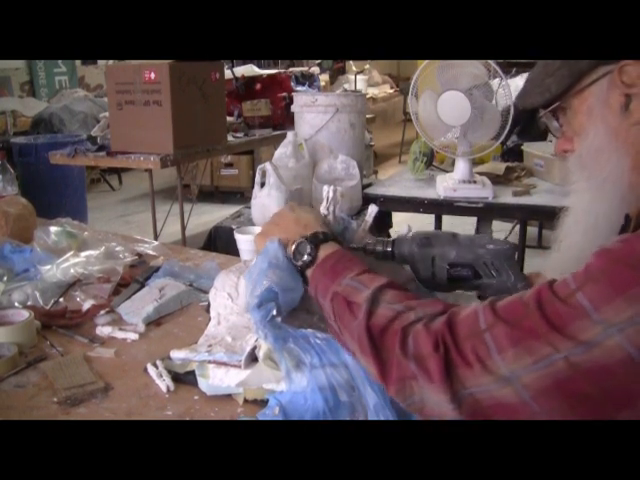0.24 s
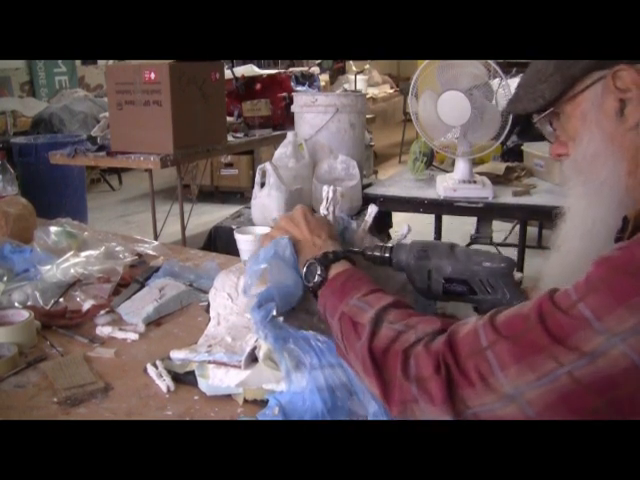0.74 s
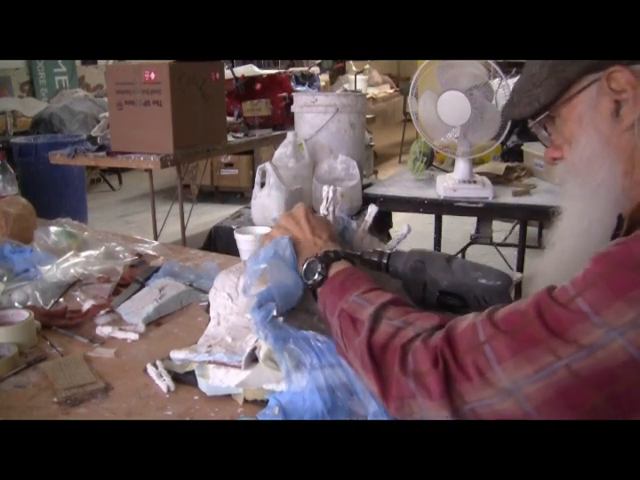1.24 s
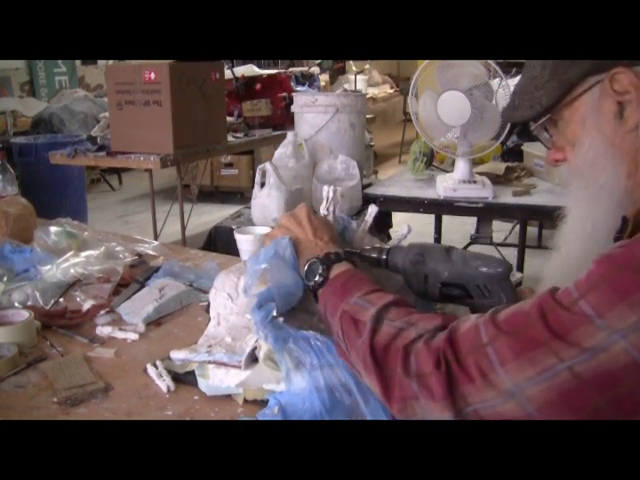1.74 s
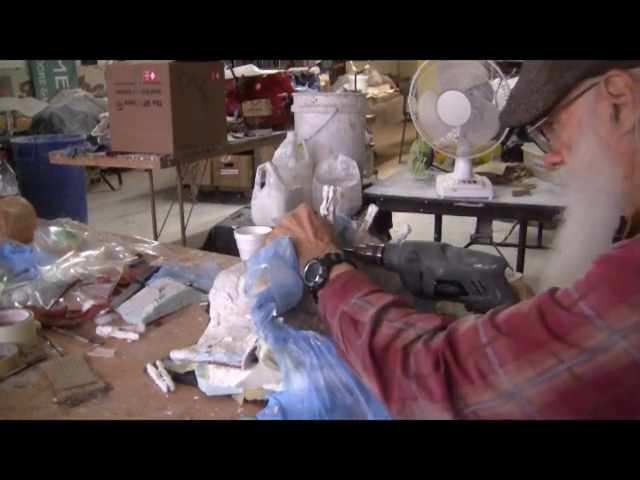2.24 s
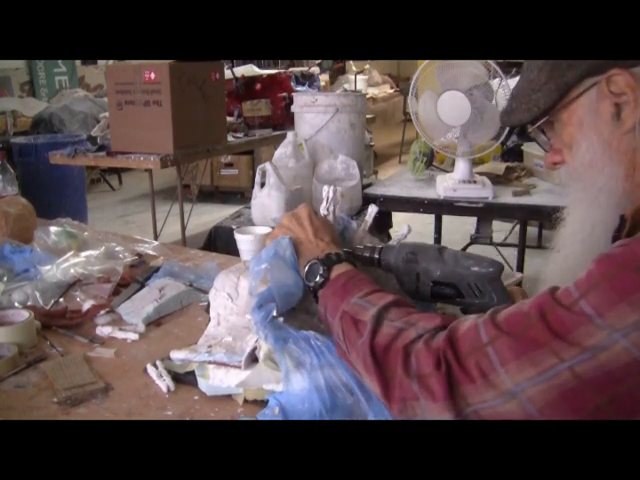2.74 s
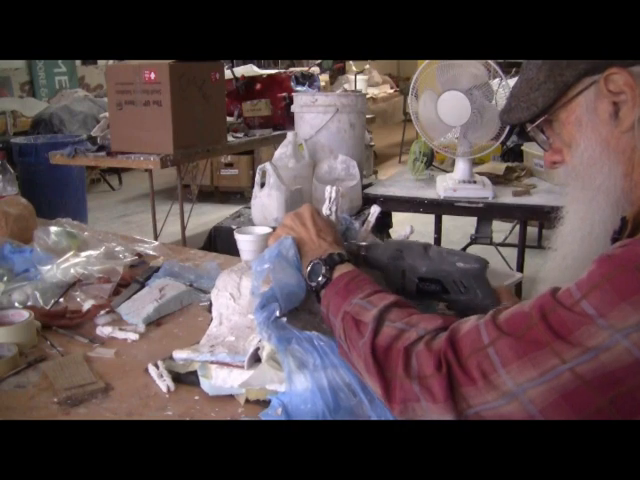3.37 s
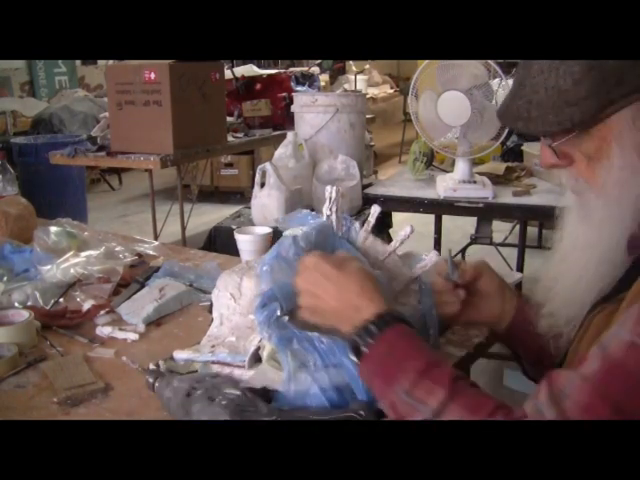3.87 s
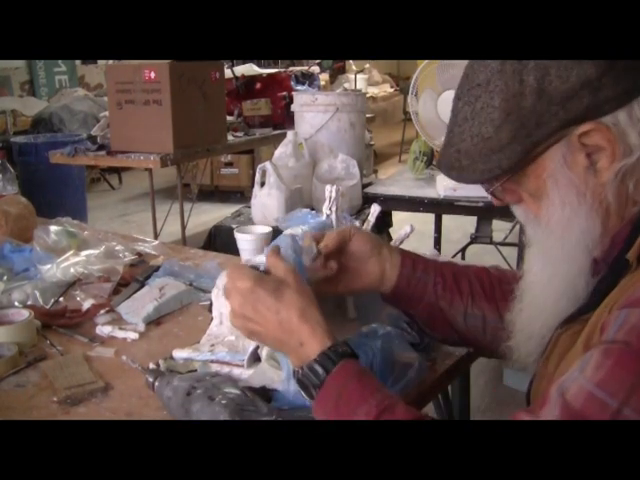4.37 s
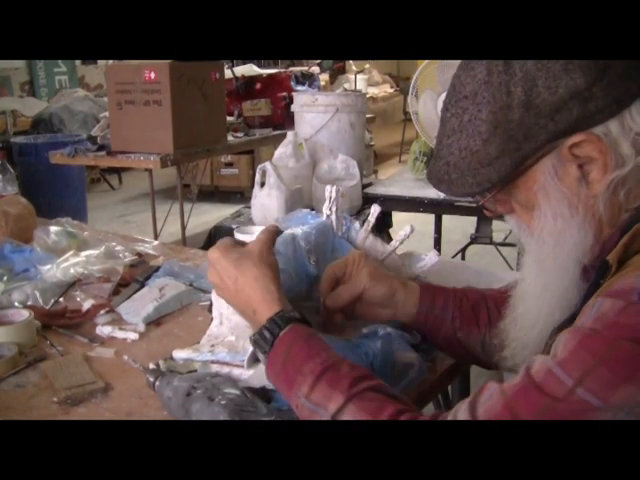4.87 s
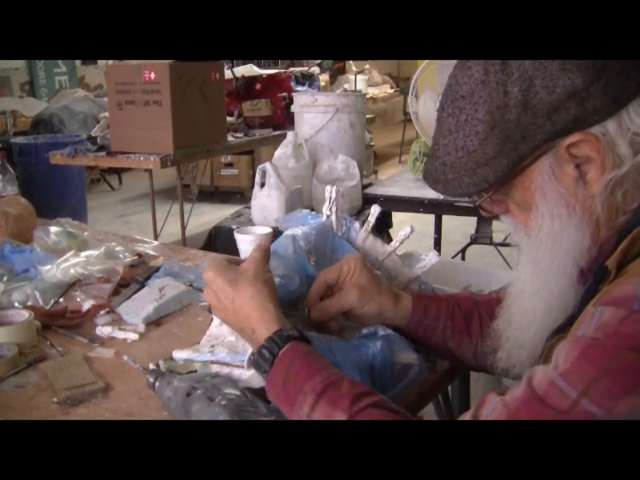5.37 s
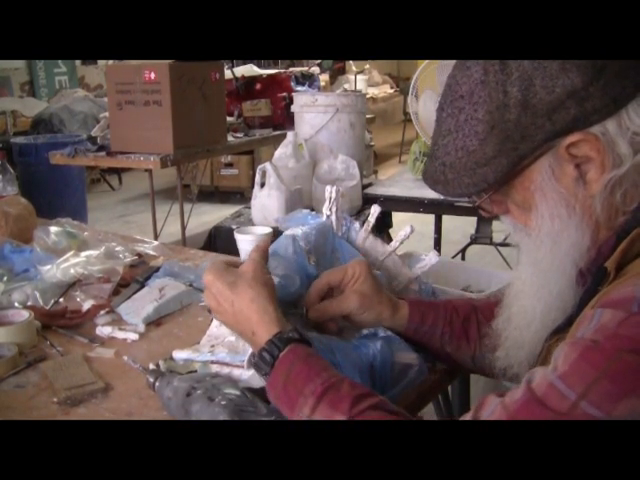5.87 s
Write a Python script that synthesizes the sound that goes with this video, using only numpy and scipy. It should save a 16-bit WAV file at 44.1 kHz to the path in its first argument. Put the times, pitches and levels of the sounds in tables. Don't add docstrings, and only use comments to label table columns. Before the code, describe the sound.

In a small workshop a thin plastic bag crumples and snaps close by over a soft fan wash. Small creaks follow, then a corded drill whirs up to a bright, gritty gear whine, boring steadily with slight pitch sags. It loosens and rattles, then is cut off mid-whine. The fan sounds louder, with a quick flurry of plastic crackle and scattered small snaps. Close stereo camera microphone.

```python
import sys
import numpy as np
from scipy import signal
from scipy.fft import rfft, irfft, next_fast_len
from scipy.io import wavfile

SR = 44100
rng = np.random.default_rng(int(sys.argv[2]) if len(sys.argv) > 2 else 0)


def invert_db(level):
    return 10 ** (np.asarray(level, dtype=float) / 20)


def file_out(sig):
    cols = np.atleast_2d(sig).T
    lim = np.clip(cols, -1, 1)
    pcm = np.round(lim * 32767).astype(np.int16)
    wavfile.write(sys.argv[1], SR, pcm)


N = 269451
TIME = np.arange(N) / SR
PADDED = next_fast_len(N)
HZ = np.fft.rfftfreq(PADDED, 1 / SR) + 1
TRIGGER_S, CUT_S = 1.24, 3.776


def evened(x):
    return x / np.sqrt(np.mean(x ** 2) + 1e-20)


def read(points, hz):
    f, value = np.transpose(points)
    return np.interp(np.log(hz + 1), np.log(f + 1), value)


def curve(rows):
    s, value = np.transpose(rows)
    return np.interp(TIME, s, value)


def ramp(start_s, end_s):
    return np.interp(TIME, [start_s, end_s], [0, 1])


def coloured(x, points, lo_hz=0, hi_hz=30000):
    edges = 1 / np.sqrt((1 + (lo_hz / HZ) ** 8) * (1 + (HZ / hi_hz) ** 8))
    return irfft(rfft(x, PADDED) * invert_db(read(points, HZ)) * edges, PADDED)[:N]


def resonate(x, hz, width):
    turn = np.exp(2j * np.pi * hz * np.arange(len(x)) / SR)
    r = np.exp(-np.pi * width / SR)
    return 2 * (turn * signal.lfilter([1 - r], [1, -r], x / turn)).real


def resonate_twice(x, hz, width):
    return resonate(resonate(x, hz, width), hz, width)


def wander(hz):
    knots = rng.standard_normal(int(4 * hz * N / SR) + 8)
    knots = np.convolve(knots, np.hanning(6), "same")
    return np.interp(TIME, np.linspace(0, N / SR, len(knots)), evened(knots))


def spread(x, other, same, left):
    likeness = np.clip(read(same, HZ), 0, 1)
    lean = invert_db(read(left, HZ) / 2)
    a = rfft(x, PADDED) * np.sqrt((1 + likeness) / 2)
    b = rfft(other, PADDED) * np.sqrt((1 - likeness) / 2)
    return irfft(np.array([(a + b) * lean, (a - b) / lean]), PADDED)[:, :N]


def room(x, t60, wet_db):
    t = np.arange(SR // 2) / SR
    tail = rng.standard_normal((2, len(t))) * invert_db(-60 * t / t60) * (t > .004)
    tail /= np.linalg.norm(tail[0])
    return x + invert_db(wet_db) * signal.fftconvolve(x, tail, axes=1)[:, :N]


def dulled(x):
    return signal.sosfilt(signal.butter(5, 12300, fs=SR, output="sos"), x)


# (time [s], level [dB])
FAN_LEVEL = [
    [(0, -44.5), (1.25, -44.5)],
    [(1.45, -50), (2., -52.5), (3.77, -56)],
    [(3.78, -34.5), (4.5, -36), (5.3, -36), (5.85, -34), (6.11, -33)],
]
# (frequency [Hz], level per Hz [dB])
WASH_BEFORE = [(12, -41), (20, -5.5), (222, 1.5), (434, -3), (485, -4), (849, -12), (1260, -10.5),
               (1760, -11.5), (2320, -18), (3440, -17.5), (6910, -27), (9400, -41), (16000, -26)]
WASH_AFTER = [(12, -55), (20, -23), (63, -14), (134, -1.5), (182, -6), (255, 1), (422, 0), (499, -8),
              (802, -7.5), (1090, -17.5), (1440, -22.5), (1910, -24), (5530, -40), (9670, -50),
              (16000, -44)]
# (frequency [Hz], width [Hz], level [dB])
CAGE_HUMS = [(265, 11, -49.5), (657, 6.6, -57), (1434, 47, -50), (2440, 350, -64.5)]
# (frequency [Hz], likeness [0-1])
FAN_SAME = [(60, 0.98), (180, 0.81), (550, 0.78), (1650, 0.46), (4970, 0.074), (15000, 0.079)]
# (frequency [Hz], level [dB])
ROOM_LEFT = [(60, -1), (180, -1), (550, 5), (1650, 1.5), (4970, 1.0), (15000, -1.5)]


def fan():
    level = invert_db(curve(sum(FAN_LEVEL, [])))
    after = TIME > CUT_S
    ports = []
    for port in range(2):
        air = rng.standard_normal(N) * invert_db(0.9 * wander(48))
        first, second = [coloured(air, wash) / np.std(coloured(air, wash, 43, 345))
                         for wash in (WASH_BEFORE, WASH_AFTER)]
        hums = sum(invert_db(db) * evened(resonate(air, hz, width)) for hz, width, db in CAGE_HUMS)
        ports.append(level * np.where(after, second, first) + after * hums)
    return spread(*ports, FAN_SAME, ROOM_LEFT)


# (peak time [s], crumple [dB], time to swell 10 dB [ms], time to fade 10 dB [ms], low scrape over it [dB])
SQUEEZES = [(.06, -34, 54, 80, -6), (.2, -35.5, 70, 83, -1.5), (0.401, -25.5, 41, 43, -1.5),
            (.44, -32, 62, 100, -3), (.61, -30.5, 40, 130, -2.5), (.68, -44, 48, 120, 6),
            (.95, -42, 100, 9, -14), (1.21, -41, 70, 46, 0), (3.997, -33.5, 0, 60, -14),
            (4.028, -31.5, 19, 50, -8), (4.074, -20, 13.5, 23, -5), (4.11, -36.5, 25, 90, -10),
            (4.19, -58, 60, 12, -7), (4.357, -35, 2, 40, 6), (4.433, -29.5, -11, 25, -7),
            (4.45, -22.5, 11, 23, -6), (4.49, -27, 15, 25, -3.5), (4.528, -25, 5, 41, -6),
            (4.66, -34, 150, 239, -3.5), (4.85, -49, 102, 114, 4), (5.1, -45.5, 298, 137, 2),
            (5.63, -43, 80, 76, 3), (5.83, -46.5, 26, 25, 5), (6.11, -45, 131, 100, -6)]


def squeezes():
    crumple = invert_db(2 * -55.5)
    scrape = invert_db(2 * np.where(TIME < CUT_S, -71, -43))
    for s, db, swell_ms, fade_ms, scrape_db in SQUEEZES:
        slope_ms = np.maximum(np.where(TIME < s, swell_ms, fade_ms), 3)
        power = invert_db(2 * (db - 10 * abs(TIME - s) * 1000 / slope_ms))
        crumple = crumple + power
        scrape = scrape + power * invert_db(2 * scrape_db)
    return 10 * np.log10(crumple), 10 * np.log10(scrape)


# (frequency [Hz], level per Hz [dB])
FILM = [(350, -34), (600, 3.5), (726, -1.5), (855, 4), (1020, 3), (1490, -0.5), (1660, 1), (2340, 0),
        (3570, -2.5), (4880, -2.5), (5510, -7), (9630, -1), (15500, -38)]
# (frequency [Hz], likeness [0-1])
BENCH_SAME = [(60, 0.22), (180, 0.25), (550, 0.88), (1650, 1), (4970, 1), (15000, 0.48)]


def bag(per_s=5000, size_db=5.5):
    crumple_db, scrape_db = squeezes()
    folds = []
    for port in range(2):
        sizes = invert_db(size_db * np.minimum(rng.exponential(1, N), 4)) * rng.choice([-1, 1], N)
        folds.append(sizes * (rng.random(N) < per_s / SR) + rng.standard_normal(N))
    high = [evened(coloured(f, FILM, 2800, 30000)) for f in folds]
    low = [evened(coloured(f, FILM, 490, 2020)) for f in folds]
    flecks = rng.exponential(1, N) * (rng.random(N) < 90 / SR)
    high[0] += 17 * resonate_twice(flecks, 9250, 2200)
    hands_free = (TIME < TRIGGER_S) | (TIME > CUT_S)
    clumps = invert_db(1.42 * wander(60)) * hands_free
    ports = [clumps * (invert_db(crumple_db - 2.4) * h + invert_db(scrape_db - 3.3) * l)
             for h, l in zip(high, low)]
    return room(spread(*ports, BENCH_SAME, ROOM_LEFT), 0.16, -17.5)


# (time [s], peak
# level [dB], ring [Hz], crack over it [dB])
SNAPS = [(0.156, -16, 1300, -10.5), (0.192, -10.5, 1430, -13.5), (0.2162, -35, 1150, -14),
         (0.3675, -17, 1140, -10), (0.3955, -17, 2580, -3), (0.6688, -18, 1170, -19),
         (0.7615, -25.5, 3480, -5), (1.174, -33, 1270, -2), (1.243, -27.5, 1020, 3), (1.277, -13, 885, -34),
         (1.3054, -3, 2170, -35), (4.0234, -31, 1030, 1), (4.0706, -20.5, 2170, -10),
         (4.354, -13, 1090, -8), (4.4466, -20, 3900, -15), (4.4653, -30, 3450, -14), (4.524, -15, 990, -12),
         (4.6688, -21, 1340, -22), (5.21, -29, 1520, -20), (5.2694, -54, 1490, 4),
         (5.459, -18.5, 1220, -16.5), (5.5944, -30, 921, -18), (5.665, -24, 2020, -13),
         (5.6785, -24, 902, -13), (5.7644, -31, 902, -13)]
CREAKS = [.8214, .8545, .9036, .9346, .9692, 1.0017, 1.0516, 1.0804, 1.1204, 1.152, 1.189]


def snaps_and_creaks():
    out = np.zeros((2, N))
    t = np.arange(800) / SR
    lean = invert_db(np.array([[0.5], [-0.5]]) / 2)
    pops = SNAPS + [(s, -29, 1680, -19) for s in CREAKS]
    for s, db, hz, crack_db in pops:
        puff = rng.standard_normal(len(t))
        ring = np.sin(2 * np.pi * hz * t) * np.exp(-t / 0.00089)
        crack = resonate(puff, 3100, 1300) * np.exp(-t / 0.0025)
        tick = resonate_twice(puff, 7200, 3000) * np.exp(-t / 0.00092)
        pop = ring + invert_db(crack_db + 7) * crack / abs(crack).max()
        pop += invert_db(crack_db - 4) * tick / abs(tick).max()
        at = round(s * SR)
        out[:, at:at + len(t)] += invert_db(db) * pop * lean
    return room(dulled(out), 0.17, -9)


TOP_HZ = 440
# (time [s], speed [Hz])
SAG = [
    (1.95, -1),
    (2.1, 2),
    (2.22, -1.7),
    (2.43, 1.4),
    (2.73, -2.8),
    (3.07, .2),
    (3.42, -2.8),
    (3.49, -5.5),
    (3.776, 11),
]


def speed():
    age = np.maximum(TIME - 1.2037, 0) / .264
    spin_up = TOP_HZ * (1 - np.exp(-age ** 1.097))
    jerk = (TIME - 1.347) / .045
    return spin_up + 24 * jerk * np.exp(-jerk ** 2) + curve(SAG)


def bit_through():
    return ramp(3.46, 3.6)


PINION, GEAR, VANES = 5, 46, 35
# (multiple of the armature, multiple of the chuck gear added, level [dB])
TONES = [(4, 0, -41), (5, -3, -41), (5, -2, -43), (5, -1, -34), (5, 0, -26), (5, 1, -27), (5, 2, -39),
         (5, 3, -41), (6, -1, -41), (6, 0, -36), (9, -2, -38), (9, -1, -39), (10, -2, -34), (10, -1, -32),
         (10, 0, -24), (10, 1, -24), (10, 2, -39), (10, 3, -36), (11, 0, -40), (11, 2, -44), (14, 0, -47),
         (15, 0, -36), (15, 1, -42), (16, 0, -44), (19, 2, -46), (20, -1, -42), (20, 0, -38), (20, 1, -42),
         (20, 2, -38), (22, 0, -42)]
# (multiple of the armature, multiple of the chuck gear, level [dB])
UNBALANCE = [(0, 1, -60), (0, 6, -53), (1, 0, -40.5), (2, 0, -46)]
# (frequency [Hz], level [dB])
TOOTH_OUT = [(300, -60), (450, -34), (1050, -26.5), (1200, -25), (1500, -18.5), (1800, -30), (2010, -21.5),
             (2200, -21.5)]
DOUBLE_OUT = [(650, -32), (900, -21.5), (1350, -33), (1900, -10), (2360, -19), (3500, -14.5), (4020, -19.5),
              (4380, -19.5)]


def gear_whine(hz, turn, gear, seated):
    out = np.zeros(N)
    tooth_db, double_db = read(TOOTH_OUT, PINION * hz), read(DOUBLE_OUT, 2 * PINION * hz)
    unload_db = -17 * bit_through() * (0.5 - seated)
    turn = turn + .032 * (1 - seated) * wander(150)
    for order, side, db in TONES:
        mesh, casing_db = (PINION, tooth_db) if order < 8 else (2 * PINION, double_db)
        steady = np.sqrt(sum(invert_db(2 * d) for m, n, d in TONES if m == mesh))
        start = rng.random() if abs(side) > 1 else 0
        if side == 0 and order == mesh:
            firm = 1
        else:
            firm = seated ** (1.5 if side else .6)
        flutter_db = (.8 + 4 * (1 - seated)) * wander(25)
        level = firm * invert_db(db + casing_db + flutter_db + unload_db) / steady
        out += level * np.cos(2 * np.pi * (order * turn + side * gear + start))
    shake = (np.gradient(gear) * SR / 47.5) ** 2 * invert_db(wander(8) + 7 * (1 - seated))
    for order, side, db in UNBALANCE:
        out += shake * invert_db(db) * np.cos(2 * np.pi * (order * turn + side * gear))
    return np.sqrt(2) * out


# (time [s], level [dB])
CHATTER_LEVEL = [
    (1.235, -48),
    (1.26, -39),
    (1.29, -33),
    (1.31, -17),
    (1.5, -21),
    (1.82, -18),
    (2.2, -22.5),
    (3.45, -22.5),
    (3.776, -25),
]
# (frequency [Hz], level per Hz [dB])
CASING = [(59, -66), (100, -39.5), (330, -24.5), (520, -14.5), (748, -19), (1110, -11), (1920, -9.5),
          (2180, -6), (2420, -5.5), (2630, -4.5), (4090, -5), (4350, -3), (5370, -17.5), (9660, -11.5),
          (15000, -38)]
# (frequency [Hz], width [Hz], level [dB])
KNOCK = [(2413, 106, -1), (3450, 450, 23.5), (3890, 530, -55), (4400, 210, -26), (9000, 1500, -10.5)]


def tooth_chatter(chatter, throb, seated):
    sharp = np.exp(6 * (throb - seated ** 2))
    blow = sharp * invert_db(2 * wander(30) - 2 * (1 - seated)) * rng.standard_normal(N)
    knock = evened(sum(invert_db(db) * resonate_twice(blow, hz, width) for hz, width, db in KNOCK))
    teeth = evened(coloured(chatter, CASING, 1800, 5200)) * invert_db(3 * throb - 2)
    chuck = 3 * seated * (1 - seated) * invert_db(-5) * evened(resonate_twice(chatter, 3610, 320))
    return invert_db(curve(CHATTER_LEVEL)) * (teeth + invert_db(-4.5) * knock + chuck)


# (frequency [Hz], width [Hz], level over the bite [dB])
MOULD = [(285, 40, -23), (560, 120, -22), (890, 30, -14)]


def bit_bite(chatter, throb, seated):
    through = bit_through()
    slack_db = -27 * (1 - ramp(1.15, 1.294))
    level_db = -27 + 4 * (1 - seated) + 4 * through + slack_db
    shell = sum(invert_db(db) * evened(resonate_twice(chatter, hz, width)) for hz, width, db in MOULD)
    rasp = invert_db(-14.5) * evened(resonate_twice(chatter, 1360, 540))
    bite = evened(coloured(chatter, CASING, 0, 1300)) + (1 - through) * shell + through * rasp
    return bite * invert_db(level_db + throb + 1.7 * wander(30))


# (frequency [Hz], width [Hz], level over the hiss [dB])
VENTS = [(5206, 190, -20.5), (6435, 550, -15), (7960, 83, -16), (8630, 640, -10.5), (9710, 350, -12.5)]


def vent_hiss(chatter, throb, hz):
    level_db = -23.5 - 5 * (1 - hz / TOP_HZ) + 3 * bit_through() - 18 * (1 - ramp(1.27, 1.305))
    slots = sum(invert_db(db) * evened(resonate_twice(chatter, f, width)) for f, width, db in VENTS)
    return (slots + evened(coloured(chatter, CASING, 4660))) * invert_db(level_db + 0.5 * throb - 3)


def rattle(hz, turn, gear, seated):
    rough_db = (2.93 - 2.8 * seated) * wander(310) + np.cos(2 * np.pi * turn)
    chatter = rng.standard_normal(N) * invert_db(rough_db)
    throb = seated ** 2 * np.cos(2 * np.pi * (gear - .1))
    work = tooth_chatter(chatter, throb, seated) + bit_bite(chatter, throb, seated)
    return dulled(work + vent_hiss(chatter, throb, hz))


# (frequency [Hz], level [dB])
VANE_OUT = [(7000, -48), (8300, -31), (9700, -42), (11200, -38), (13500, -44), (14800, -41), (15350, -43),
            (15750, -42)]


def vane_whine(hz, turn):
    lag = 2.5 * np.array([[0], [1]]) * (hz / 438) ** 2
    whine = np.cos(2 * np.pi * VANES * turn - lag)
    whine += invert_db(-24) * np.cos(2 * np.pi * (VANES - 2) * turn - lag)
    level_db = read(VANE_OUT, VANES * hz) + 1.5 * wander(12)
    return np.sqrt(2) * whine * invert_db(level_db) * np.clip((hz - 200) / 25, 0, 1)


# (time [s], seating [0-1])
SEATED = [
    (1.24, 0),
    (1.45, .35),
    (1.8, .5),
    (2.05, 1.),
    (3.47, 1.),
    (3.56, .65),
    (3.635, .1),
    (3.7, .75),
    (3.776, .3),
]
# (frequency [Hz], level [dB])
DRILL_LEFT = [(200, 1), (500, 2.5), (1000, 1), (2000, .2), (4000, 0), (8000, .6), (12000, -1)]


def drill():
    hz = np.maximum(speed(), 0)
    seated = np.clip(curve(SEATED), 0, 1)
    on = np.clip((TIME - TRIGGER_S) / 0.005, 0, 1)
    turn = np.cumsum(hz * (on > 0)) / SR
    gear = turn * PINION / GEAR + .3
    buzz = invert_db(-38) * np.exp(-((TIME - TRIGGER_S) / 0.14) ** 2) * np.sin(2 * np.pi * 120 * TIME)
    near = on * (gear_whine(hz, turn, gear, seated) + rattle(hz, turn, gear, seated) + buzz)
    bench_echo = invert_db(-8.5) * np.roll(near, 170)
    tool = room(spread(near, bench_echo, BENCH_SAME, DRILL_LEFT), 0.11, -13)
    return (tool + vane_whine(hz, turn)) * (TIME < CUT_S)


def scene():
    return fan() + bag() + snaps_and_creaks() + drill()


def top_cut(x):
    return signal.sosfilt(signal.butter(12, 15900, fs=SR, output="sos"), x)


def record(dry):
    overloaded = np.tanh(dry / 1.3) * 1.3
    band_limit = signal.ellip(8, .3, 70, 15850, fs=SR, output="sos")
    mix = signal.sosfilt(band_limit, overloaded)
    return top_cut(mix)


dry = scene()
out = record(dry)
file_out(out)
```